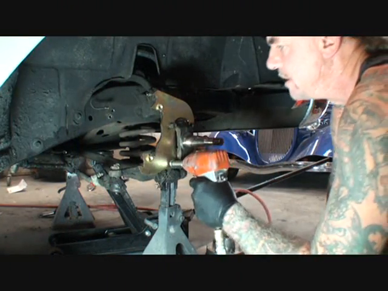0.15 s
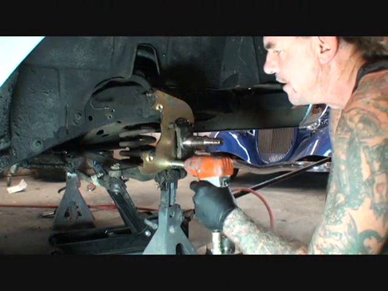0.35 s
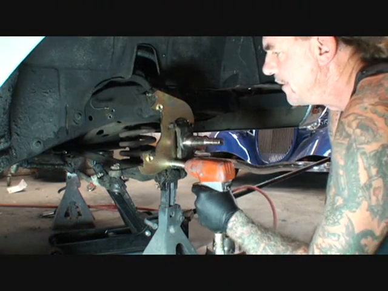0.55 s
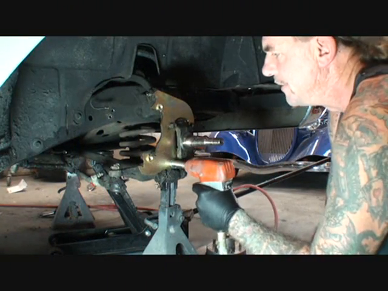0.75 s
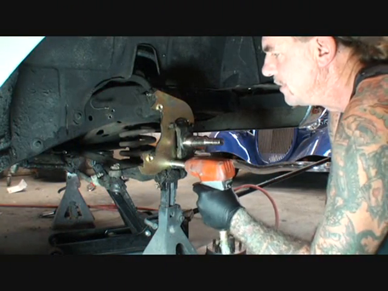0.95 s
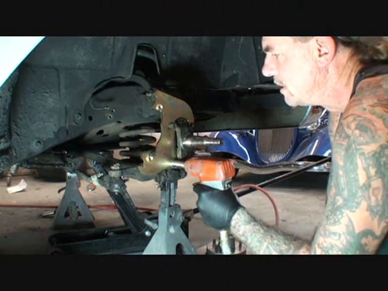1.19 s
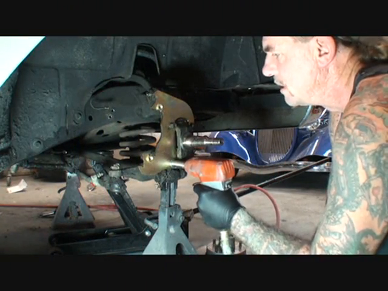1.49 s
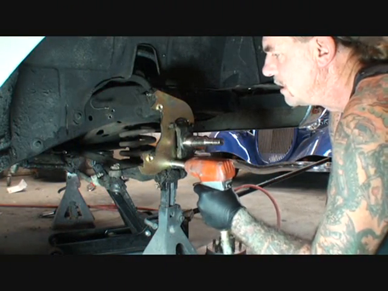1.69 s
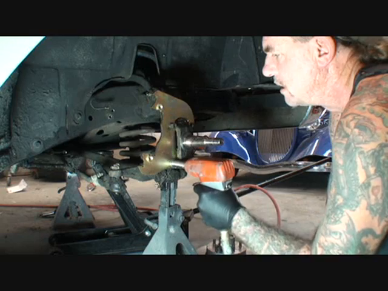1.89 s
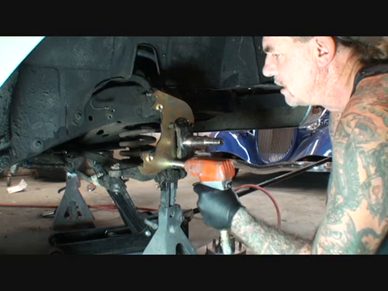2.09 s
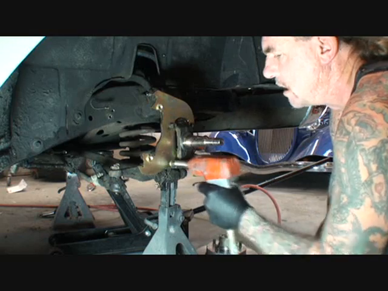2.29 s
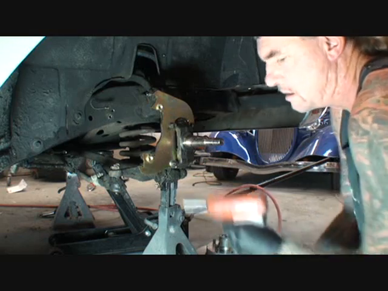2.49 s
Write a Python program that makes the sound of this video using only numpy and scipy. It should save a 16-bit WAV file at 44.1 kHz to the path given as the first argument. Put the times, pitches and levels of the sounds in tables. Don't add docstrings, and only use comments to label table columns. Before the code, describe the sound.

A loud air impact wrench hammers a bolt on a car part: three socket clacks over a hose hiss, then rapid ringing blows and exhaust roar, stopping abruptly into garage echo, heard from about two metres.

```python
import sys
import numpy as np
from scipy import signal
from scipy.fft import rfft, irfft, next_fast_len
from scipy.io import wavfile
from scipy.ndimage import uniform_filter1d

SR = 44100
rng = np.random.default_rng(int(sys.argv[2]) if len(sys.argv) > 2 else 0)


def invert_db(x):
    u = np.asarray(x, float) / 20
    return 10 ** u


def master(y):
    cut = np.clip(np.atleast_2d(y).T, -1, 1)
    pcm = np.round(cut * 32767)
    wavfile.write(sys.argv[1], SR, pcm.astype(np.int16))


N = 116865

# t/s, angle/turns
TURNS = [(.6755, 0), (.8145, 3), (.867, 4), (.947, 5), (.999, 6), (1.328, 13), (1.708, 21), (1.846, 24),
         (2.132, 30), (2.177, 31), (2.216, 32), (2.311, 34), (2.362, 35)]
# f/Hz, width/Hz, level/dB
BRACKET = [(265, 59, -9), (414, 46, 1.5), (524, 74, 6), (675, 43, 8.5), (790, 84, -3), (1220, 123, 3.5),
           (1317, 120, -2), (1650, 28, 11.5)]
SECOND_JAW_LAG_S = 0.022


def level(x, db):
    return x * invert_db(db) / np.sqrt(np.mean(x[SR:2 * SR] ** 2))


def colour(x, spectrum):
    hz, db = np.array(spectrum).T
    size = next_fast_len(N)
    f = np.maximum(np.arange(size // 2 + 1) * SR / size, 1)
    gain = invert_db(np.interp(np.log(f), np.log(hz), db))
    return irfft(rfft(x, size) * gain, size)[:N]


def ring(x, hz, t60):
    pole = np.exp(2j * np.pi * hz / SR - np.log(1000) / (t60 * SR))
    return signal.lfilter([1], [1, -pole], x).imag


def band(x, hz, width):
    return signal.lfilter(*signal.iirpeak(hz, hz / width, fs=SR), x)


def spikes(times, gains):
    x = np.zeros(N)
    np.add.at(x, np.clip((np.asarray(times) * SR).astype(int), 0, N - 1), gains)
    return x


def fade(x, t60):
    return signal.lfilter([1], [1, -np.exp(-np.log(1000) / (t60 * SR))], x)


def walk(rate):
    k = int(SR / rate)
    held = np.repeat(rng.standard_normal(N // k + 1), k)
    return 1.23 * uniform_filter1d(uniform_filter1d(held, k), k)[:N]


def leak():
    # f/Hz, level/dB per Hz
    hiss_spectrum = [(18, -43), (30, -8), (194, -10), (394, -9), (822, -8), (1390, -8.5), (2610, -3.5),
                     (8520, -2), (16000, -10.5)]
    # f/Hz, width/Hz, level/dB
    whistles = [(4040, 210, 3), (6600, 250, 2), (8200, 900, 2), (9600, 500, 2.5)]
    gain_drop_db, gain_drop_at_s = -12, .665
    hiss = colour(rng.standard_normal(N), hiss_spectrum)
    hiss = hiss + sum((invert_db(db) - 1) * band(hiss, hz, width) for hz, width, db in whistles)
    hiss = level(hiss * invert_db(.5 * walk(4.7)), -33)
    reaction = np.clip((np.arange(N) / SR - gain_drop_at_s) / .03, 0, 1)
    return hiss * invert_db(gain_drop_db * reaction)


def clacks():
    # t/s, level/dB, steel part struck (only whole numbers 0-2 sound)
    contacts = [(.2402, -19.5, 0), (.2440, -14.5, 0), (0.247, -17, 0), (0.261, -24.5, 0), (.2845, -23, 0),
                (0.2923, -29, 0), (0.4078, -7.5, 1), (0.412, -12, 1), (0.4983, -11, 2), (0.5006, -17, 2),
                (0.505, -19, 2), (0.511, -23, 2), (2.2640, -7, 0.074)]
    # f/Hz, level/dB, t60/s
    parts = [
        [(730, -30, 0.034), (1170, -12.5, .03), (1740, 1, 0.032), (2160, -3.5, 0.031), (3010, 0, 0.044),
         (4220, -6.5, 0.013), (5320, -15, 0.018)],
        [(1140, -22, 0.049), (1740, -13.5, .018), (2660, -2, .015), (3210, -5.5, 0.014), (4140, -8.5, .014),
         (5200, -24, .012), (7200, -25, .012)],
        [(1570, -15, 0.037), (1830, -16, 0.026), (2300, 4.5, 0.021), (2890, 2.5, 0.026), (3220, -8, .022),
         (4680, -5, 0.043), (4786, -5, 0.017), (6600, -17, 0.017)],
    ]
    body_db = [-13.5, -27.5, -20]
    noise_db, noise_t60_s = 2.5, 0.047
    tick_db, tick_t60_s = -16, 0.0099
    body_t60_s = 0.33
    out = np.zeros(N)
    for part, modes in enumerate(parts):
        rows = np.array([r for r in contacts if r[2] == part])
        times, gains = rows[:, 0], invert_db(rows[:, 1])
        hits = spikes(times, gains)
        for hz, db, t60 in modes:
            signs = rng.choice([-1, 1], len(rows))
            out += invert_db(db) * ring(spikes(times, gains * signs), hz, t60)

        spray = [(200, -49)] + [m[:2] for m in modes] + [(10000, -19), (16000, -43)]
        out += invert_db(noise_db) * colour(fade(hits, noise_t60_s) * rng.standard_normal(N), spray)
        out += invert_db(tick_db) * band(fade(hits, tick_t60_s) * rng.standard_normal(N), 7000, 7000)

        tail = uniform_filter1d(np.roll(fade(hits, body_t60_s), 200), size=400)
        shake = invert_db(body_db[part]) * tail
        out += sum(invert_db(db) * band(shake * rng.standard_normal(N), hz, 2 * width) for hz, width, db in BRACKET)
    return signal.sosfilt(signal.butter(2, 240, "high", fs=SR, output="sos"), out)


def garage(x):
    # f/Hz, t60/s, level/dB
    decays = [(320, 0.96, 7), (556, 0.69, 1.5), (900, 1, -5.5), (1500, 0.3, -2.5), (2260, 0.26, 1.5),
              (3574, 0.64, 8), (5580, 0.76, -1), (8160, 0.49, 2.5), (13100, 0.1, 0.5)]
    predelay_s = 0.0093
    t = np.arange(SR) / SR
    tail = np.zeros(SR)
    for hz, t60, db in decays:
        noise = band(band(rng.standard_normal(SR), hz, 0.65 * hz), hz, 0.65 * hz)
        tail += invert_db(db - 60 * t / t60) * noise / np.sqrt(t60)
    tail *= np.clip(t / predelay_s, 0, 1) ** 2
    return signal.fftconvolve(x, tail * np.sqrt(4 * np.log(1000) / SR))[:N]


def control(column):
    # t/s, air flow level/dB, bolt strain level/dB
    trigger = [(0.659, -3, -22), (0.663, 0, -23), (.70, 2, -12), (.73, 0, 4), (.84, 2.5, 0.5),
               (.885, 0, 9.5), (.922, -4.5, 6.5), (.943, -6, -3), (.949, 1, -3.5), (1.1, 1.5, -0.5),
               (1.5, 0.5, 1), (2.0, 0.5, -2), (2.337, 0, 0.5), (2.343, -8.5, 1.5), (2.373, -12, 0),
               (2.391, -43, -21)]
    rows = np.array(trigger)
    return invert_db(np.interp(np.arange(N) / SR, rows[:, 0], rows[:, column], left=-120, right=-120))


def main_blows():
    when, turn = np.array(TURNS).T
    return np.interp(np.arange(turn[-1] + 1), turn, when)


def jaw_blows():
    second_db, jitter_s, scatter_db = 3.5, 0.0021, 1.5
    first = main_blows()
    later = first[:-1] + SECOND_JAW_LAG_S + jitter_s * rng.standard_normal(len(first) - 1)
    jaw_a = spikes(first, invert_db(scatter_db * rng.standard_normal(len(first))))
    jaw_b = spikes(later, invert_db(second_db + scatter_db * rng.standard_normal(len(later))))
    return jaw_a, jaw_b


def exhaust():
    # f/Hz, level/dB per Hz
    roar_spectrum = [(35, -77), (60, -36), (301, -36.5), (540, -13), (2000, -4), (2350, 0), (3760, -8),
                     (8120, -7.5), (16000, -19.5)]
    flicker_db, flicker_per_s = 3, 180
    turbulence = rng.standard_normal(N) * invert_db(flicker_db * walk(flicker_per_s))
    return level(colour(turbulence, roar_spectrum), -18)


def whine():
    from_hz, to_hz = 4200, 5103
    rough_per_s, patchy_db = 900, 4.5
    when, turn = np.array(TURNS).T
    hz = from_hz + (to_hz - from_hz) * (np.interp(np.arange(N) / SR, when, turn) % 1)
    phase = 2 * np.pi * np.cumsum(hz * (1 + .03 * walk(20))) / SR
    rough = walk(rough_per_s) * np.cos(phase) + walk(rough_per_s) * np.sin(phase)
    return level(rough * invert_db(patchy_db * walk(40.52)), -27)


def crack(jaw_a, jaw_b):
    # f/Hz, level/dB per Hz
    crack_spectrum = [(1500, -38), (4000, 15), (6500, 10.5), (8200, 17), (10500, 10), (13000, -9),
                      (16000, -37)]
    t60_s, second_pitch = 0.071, 1.2
    higher = [(second_pitch * hz, db) for hz, db in crack_spectrum]
    first = colour(fade(jaw_a, t60_s) * rng.standard_normal(N), crack_spectrum)
    second = colour(fade(jaw_b, t60_s) * rng.standard_normal(N), higher)
    return level(first, -26) + level(second, -29)


def steel(jaw_a, jaw_b, flow):
    # f/Hz, width/Hz, level/dB
    steel_modes = [(2338, 85, 6), (2589, 65, 4), (2940, 250, 6), (4185, 130, -10.5), (4554, 250, 5.5),
                   (5310, 120, 0), (6440, 48, -5.5), (7730, 79, -43.5), (8150, 81, 4.5), (8980, 32, -4),
                   (9700, 100, -17), (10260, 37, -1), (11100, 100, -6), (12100, 120, -47)]
    rattle_per_s, rattle_spread_db, blow_db = 500, 3.5, 13.5
    damping = 1.5
    contact = (rng.random(N) < rattle_per_s / SR) * rng.choice([-1, 1], N)
    rattle = contact * invert_db(rattle_spread_db * np.minimum(rng.exponential(size=N), 3))
    burst = fade(jaw_a + jaw_b, 0.0053) * rng.standard_normal(N) * invert_db(blow_db - 17.5)
    drive = flow * (rattle + burst)
    out = np.zeros(N)
    for hz, width, db in steel_modes:
        gain = invert_db(db + 3.7 * walk(70)) * np.sqrt(100 / width)
        out += gain * band(drive, hz, damping * width)
    return level(out, -20.5)


def thud(jaw_b, strain):
    lag_s, t60_s = 0.0057, 0.058
    second_db, scatter_db = -9, 2.5
    first = main_blows()
    push = spikes(first, invert_db(scatter_db * rng.standard_normal(len(first)))) + invert_db(second_db) * jaw_b
    shake = np.roll(fade(push, t60_s) + 0.16, int(lag_s * SR)) * strain
    out = sum(invert_db(db) * band(shake * rng.standard_normal(N), hz, width) for hz, width, db in BRACKET)
    return level(out, -32.5)


def panel(strain):
    # f/Hz, t60/s, level/dB
    panel_modes = [(440, 1.2, -52), (520, 1.2, -53), (612, 1.5, -49), (790, .7, -56), (950, .7, -56)]
    return sum(level(ring(strain * rng.standard_normal(N), hz, t60), db) for hz, t60, db in panel_modes)


def wrench():
    jaw_a, jaw_b = jaw_blows()
    flow, strain = control(column=1), control(column=2)
    airborne = flow * (exhaust() + flow * crack(jaw_a, jaw_b) + whine())
    return airborne + steel(jaw_a, jaw_b, flow) + thud(jaw_b, strain) + panel(strain)


def scene():
    tool, socket = wrench(), clacks()
    reverberant = garage(invert_db(-10) * tool + invert_db(-19.5) * socket)
    return (tool + socket + reverberant + leak())[None]


def low_pass(x):
    return signal.sosfilt(signal.butter(12, 16930, fs=SR, output="sos"), x)


def record(dry):
    duck_db, second_duck_db = -4, -0.5
    lead_s, width_s = 0.0019, .0012
    ceiling = .85
    t = np.arange(N) / SR

    def notch(times):
        return sum(rng.uniform(0.73, 2.3) * np.exp(-((t - s + lead_s) / width_s) ** 2) for s in times)

    blows = main_blows()
    dip_db = duck_db * notch(blows[1:]) + second_duck_db * notch(blows[:-1] + SECOND_JAW_LAG_S)
    mic = ceiling * np.tanh(dry * invert_db(dip_db) / ceiling)
    mic = signal.sosfilt(signal.butter(1, 140, "high", fs=SR, output="sos"), mic)
    mic = signal.sosfilt(signal.ellip(10, .2, 70, 15850, fs=SR, output="sos"), mic)
    return low_pass(mic)


dry = scene()
out = record(dry)
master(out)
```